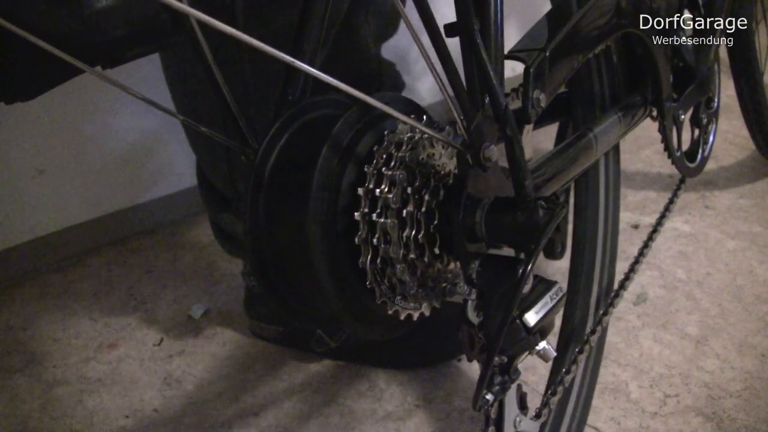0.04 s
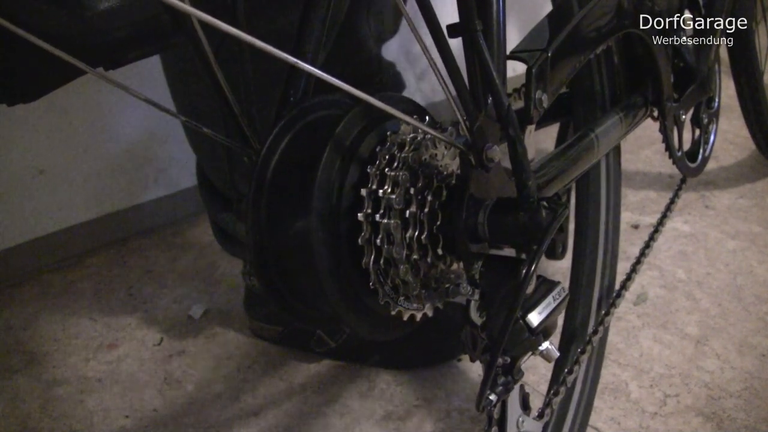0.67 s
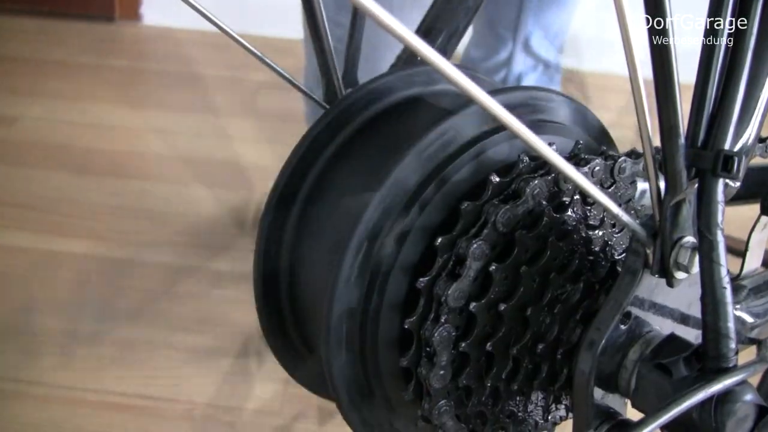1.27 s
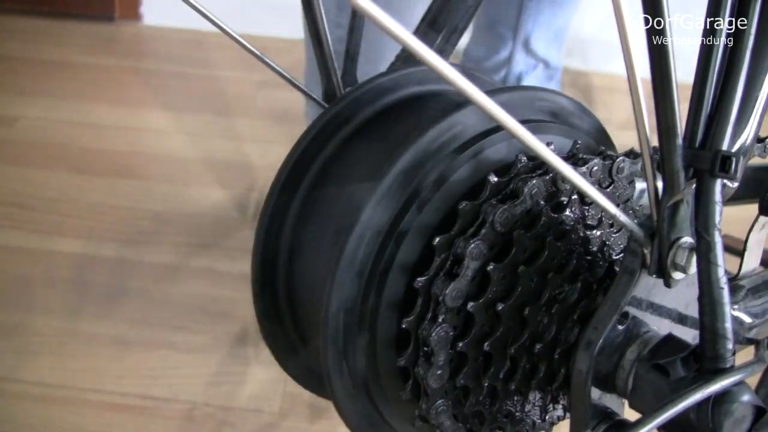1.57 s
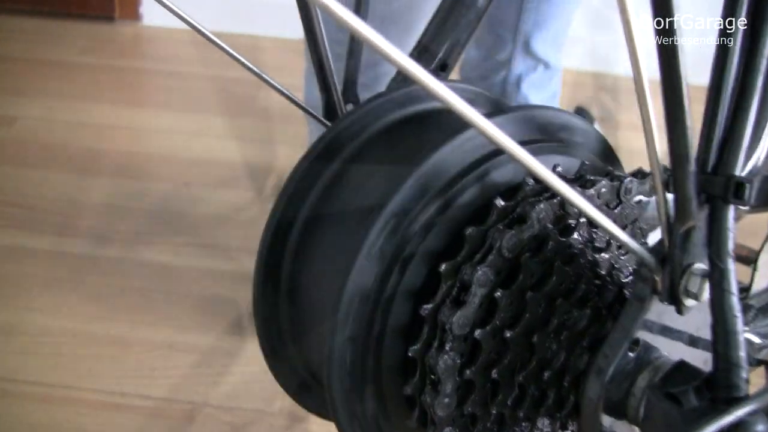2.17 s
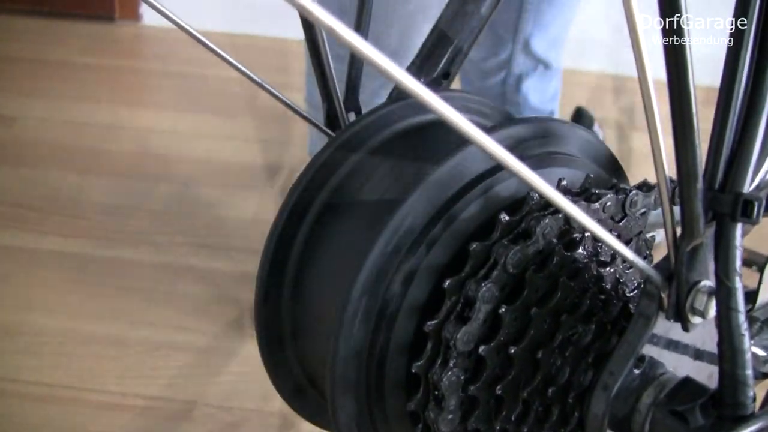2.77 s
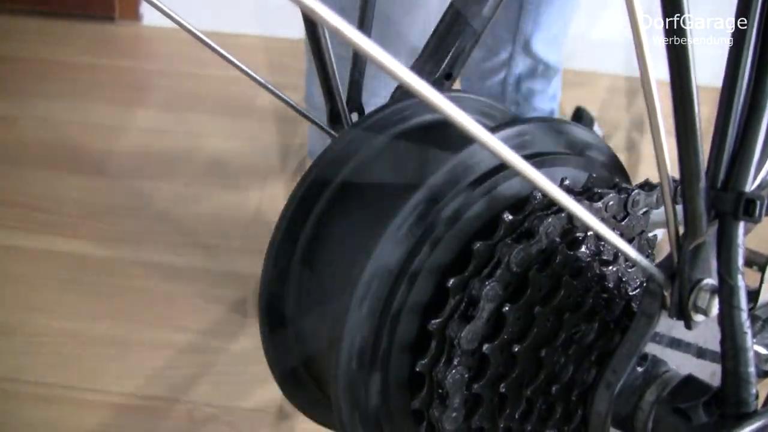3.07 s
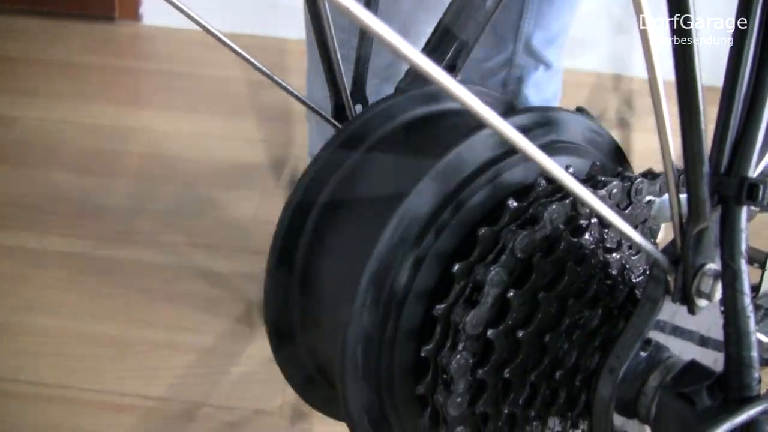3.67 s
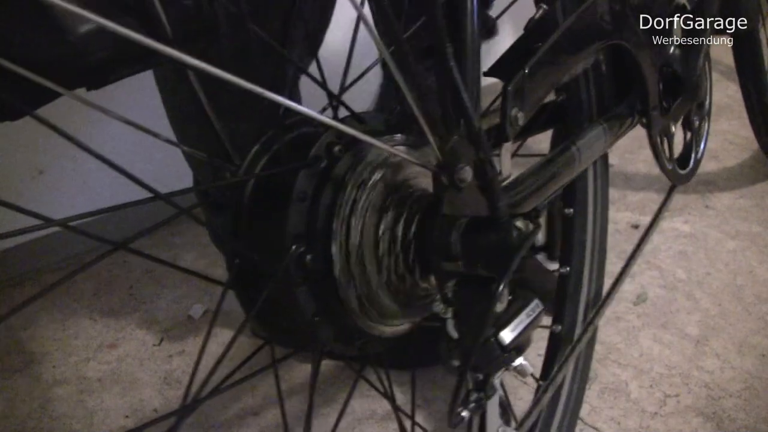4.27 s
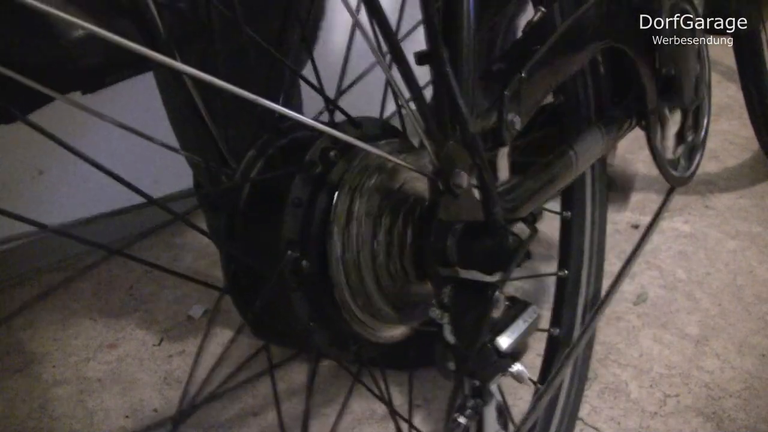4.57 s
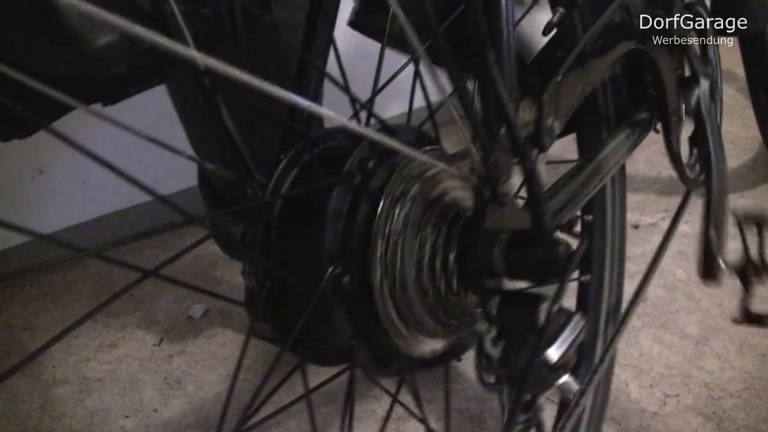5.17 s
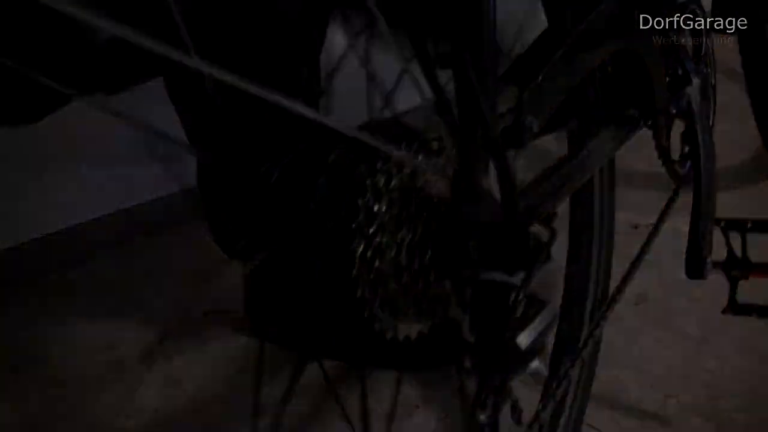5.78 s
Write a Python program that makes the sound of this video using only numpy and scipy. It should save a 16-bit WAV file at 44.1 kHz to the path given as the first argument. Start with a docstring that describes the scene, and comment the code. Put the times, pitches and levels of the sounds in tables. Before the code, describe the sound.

After a moment of faint cellar air, a bicycle freewheel cuts in very close, ticking brightly and rapidly, slowing a little over a soft whirr and a loose metallic clatter. After about three seconds it cuts off. The pedal drive takes up with a dull thud and knocks, the chain runs faintly with small clinks, and it stops with a loud steel clack that echoes in the bare room.

```python
"""Bicycle freewheel in a cellar

A rear wheel coasts close by: the pawl ticks about twelve times a second, slowing, over the whirr and
loose clatter of the hub. That sound cuts in and out over the air of an echoing cellar. Then the pedal
is kicked round: the drive takes up with a thud, the chain runs, and it stops with a steel clack."""
import sys
import numpy as np
from scipy import signal
from scipy.fft import rfft, irfft, next_fast_len
from scipy.io import wavfile
from scipy.ndimage import uniform_filter1d

SR = 44100
rng = np.random.default_rng(int(sys.argv[2]) if len(sys.argv) > 2 else 0)


def materialize(psi):
    """Save the field psi as 16-bit PCM at rate SR to the path in sys.argv[1].

    A 1-D psi becomes a single channel; in a 2-D psi each row is a channel.
    """
    bounded = np.clip(np.atleast_2d(psi).T, -1, 1)
    quanta = np.round(bounded * 32767).astype(np.int16)
    wavfile.write(sys.argv[1], SR, quanta)


N = 261513
COAST_START_S, COAST_END_S = 0.91, 3.985


def tooth_drops():
    """Pawl drops (start_s, level_db): gaps grow as the unbalanced wheel slows, wavering once a turn."""
    first_s, first_gap_s, gap_growth_s = 0.93127, 0.076399, 0.000577
    teeth, heavy_tooth, unbalance_s = 28, 13.6, 0.0017
    swell_teeth, loud_tooth = 5, 1.7
    tooth = np.arange(int((COAST_END_S - first_s) / first_gap_s))
    start_s = first_s + first_gap_s * tooth + gap_growth_s * tooth * (tooth - 1) / 2
    start_s += unbalance_s * np.cos(2 * np.pi * (tooth - heavy_tooth) / teeth)
    level_db = -15 + 1.8 * np.cos(2 * np.pi * (tooth - loud_tooth) / swell_teeth)
    return np.column_stack([start_s, level_db + rng.normal(0, 0.6, len(tooth))])


# Pawl snap spectrum: freq_hz, gain_db
SNAP_SPECTRUM = [(4000, -24.5), (6000, -15), (6800, -2), (7450, 5.5), (8000, -1.5), (8500, 2), (9800, -7.5),
                 (10800, 1.5), (11500, 6.5), (12300, -13), (13900, -3.5), (16000, -19.5)]
# Ratchet steel modes: freq_hz, level_db, t60_s
RATCHET_MODES = [(7660, 1, 0.014), (9280, -2, 0.066), (11000, 5, 0.025), (14070, 4, 0.033)]
# Hub shell and wheel spectrum: freq_hz, gain_db
SHELL_SPECTRUM = [(150, -52), (500, -8), (1080, -2.5), (1300, -6.5), (2000, -4), (2700, -7), (4800, -3),
                  (6000, -13.5), (7500, -16.5), (16000, -34)]
def pawl():
    """The pawl scrapes over the tooth's tip, snaps down and bounces; ratchet and hub shell ring."""
    drops = tooth_drops()
    snap = blows(drops, t60_s=0.005, ring_db=-10, crack_db=-4.5)
    # one scrape, two bounces
    for delay_s, t60_s, ring_db in [(-0.0018, 0.03, -23), (0.0007, 0.002, -3.5), (0.0021, 0.014, -9)]:
        offsets_s = delay_s * rng.uniform(0.64, 1.4, len(drops))
        snap += blows(drops + np.outer(offsets_s, [1, 0]), t60_s, ring_db)
    ratchet = amp(-26.5) * ringing(drops, RATCHET_MODES, spread_db=2.5)
    shell = blows([(s, rng.normal(-27.5, 1.5)) for s in drops[:, 0]], t60_s=0.029, ring_db=-3)
    return through(snap, SNAP_SPECTRUM) + ratchet + through(shell, SHELL_SPECTRUM)


# Hardest knocks of loose wheel parts: start_s, level_db, pitch_hz
HARD_KNOCKS = [(0.9346, -17, 2130), (0.9703, -16.5, 1860), (0.9819, -22, 2560), (1.1262, -13.5, 1680),
               (1.282, -23.5, 3020), (1.2926, -21, 1610), (1.3029, -25, 1980), (1.3415, -22, 3780),
               (1.3892, -16.5, 2960), (1.4523, -18, 1990), (1.496, -20.5, 2420), (1.5073, -27.5, 3280),
               (1.5403, -24, 2930), (1.5905, -26.5, 1970), (1.654, -22.5, 2400), (1.6762, -19.5, 2260),
               (1.6913, -19, 2360), (1.779, -25, 2100), (1.842, -25, 3160), (1.8691, -17, 2670),
               (1.8806, -18.5, 2110), (1.919, -20.5, 2630), (1.9567, -16.5, 1910), (1.9788, -22, 2030),
               (2.044, -22, 2540), (2.0951, -19, 2030), (2.295, -19.5, 3040), (2.3864, -17.5, 2310),
               (2.4279, -17.5, 2290), (2.515, -19.5, 2730), (2.6153, -22.5, 1420), (2.7346, -17.5, 1860),
               (2.7673, -22.5, 3140), (2.79, -17.5, 2270), (2.834, -15, 3080), (2.9451, -21, 2600),
               (2.9759, -19.5, 1740), (3.0956, -15, 1780), (3.176, -29, 2920), (3.227, -24.5, 2730),
               (3.245, -26.5, 1910), (3.2957, -16.5, 2000), (3.324, -18, 1920), (3.3858, -23, 2110),
               (3.401, -19.5, 1700), (3.4475, -20.5, 2140), (3.5046, -19, 1930), (3.5755, -16.5, 3100),
               (3.6727, -17.5, 2300), (3.7027, -17, 2090), (3.7142, -23, 2330), (3.8125, -19.5, 4260),
               (3.945, -19.5, 1960), (3.9696, -21.5, 2760)]
def loose_knocks():
    """Rows of hard knocks, one weaker rebound each, and soft jiggling throughout."""
    rebound_s, jiggle_gap_s = 0.014, 1 / 22
    rebounds = [(s + rebound_s * rng.uniform(0.5, 1.5), db - 13, hz) for s, db, hz in HARD_KNOCKS]
    jiggles = [(s + jiggle_gap_s * rng.random(), rng.normal(-31, 2), 2100 * rng.lognormal(0, 0.214))
               for s in np.arange(COAST_START_S, COAST_END_S, jiggle_gap_s)]
    return np.vstack([HARD_KNOCKS, rebounds, jiggles])


def bending_wave(start_hz, fall_s, t60_s):
    """A blow travels along thin steel: highs arrive first, so the pitch falls."""
    t = np.arange(SR // 30) / SR
    hz = start_hz * rng.lognormal(0, 0.12) / np.sqrt(1 + t / fall_s)
    cycles = np.cumsum(hz) / SR
    envelope = -np.expm1(-2 * cycles) * amp(-60 * t / t60_s)
    return (envelope * np.sin(2 * np.pi * cycles))[None]


def clatter():
    """Each loose knock runs along the spokes and returns weaker; the shell answers late."""
    onset_s, shell_lag_s = 0.0005, 0.0028
    waves, knocks = np.zeros((2, N)), loose_knocks()
    for s, db, hz in knocks:
        add(waves, s + onset_s, amp(db + 0.5) * bending_wave(1.5 * hz, fall_s=0.0009, t60_s=0.0065))
        return_s = s + rng.uniform(0.003, 0.006)
        add(waves, return_s, amp(db - 12) * bending_wave(hz, fall_s=0.002, t60_s=0.02))
    spokes = filtered(waves, lambda hz: hz ** 2 / (hz ** 2 + 700 ** 2))  # the spoke waves carry no bass
    hits = knocks[:, :2] + [onset_s, 0]
    cracks = blows(hits, t60_s=0.003, ring_db=-13, crack_db=1)
    answers = blows(hits + [shell_lag_s, 0], t60_s=0.0072, ring_db=-9)
    return spokes + through(cracks + answers, SHELL_SPECTRUM)


# Hub whirr spectrum: freq_hz, gain_db
WHIRR_SPECTRUM = [(150, -71), (250, -14), (950, 0.5), (2100, 0), (5200, -14.5), (7570, -11), (10000, -19),
                  (11300, -11.5), (13000, -29), (14200, -16), (16000, -46)]
def whirr():
    """Dense tiny contacts in the hub, quieter as it slows."""
    sag_db_per_s = 1
    age_s = np.arange(N) / SR - COAST_START_S
    contacts = grains(rate_per_s=12000, spread_db=6)
    return amp(-43.5 - sag_db_per_s * age_s) * through(contacts, WHIRR_SPECTRUM)


def coast_gate():
    """1 while the close hub is heard, else 0."""
    t = np.arange(N) / SR
    return uniform_filter1d(1.0 * ((t > COAST_START_S) & (t < COAST_END_S)), size=300)


# Hub shell resonances: freq_hz, width_hz, gain_db
SHELL_RESONANCES = [(1080, 45, -1), (1993, 40, -1)]
# Small room decay: freq_hz, t60_s
ROOM_DECAY = [(1500, 0.28), (15000, 0.061)]
def coasting():
    """The turning hub in a small room, gated; its shell sings with knocks and whirr."""
    ticks, knocks = pawl(), clatter()
    hub = ticks + knocks + whirr()
    hub += echo(amp(-12.5) * ticks + amp(-6.5) * knocks, ROOM_DECAY)
    return coast_gate() * (hub + resonances(hub, SHELL_RESONANCES))


# Drive loading the frame: start_s, level_db, pitch_hz
THUDS = [(4.3512, -23.5, 360), (4.3805, -23, 268), (4.395, -27.5, 403), (4.416, -37, 187),
         (4.446, -53, 185), (5.055, -30.5, 740), (5.272, -31.5, 338)]
def frame_thuds():
    """Dull blows: the loaded frame swings once or twice and is still."""
    rise_cycles = 0.42
    track, t = np.zeros((2, N)), np.arange(SR // 20) / SR
    for s, db, hz in THUDS:
        age = t * hz / rise_cycles
        swing = np.sin(2 * np.pi * hz * t) * age * np.exp(1 - age)
        add(track, s, amp(db) * swing[None])
    return low_cut(track, hz=130)


# Chain and crank knocks: start_s, level_db
CRANK_KNOCKS = [(3.97, -35), (4.3515, -34.5), (4.372, -25.5), (4.397, -23.5), (4.712, -37.5), (5.055, -34),
                (5.083, -36), (5.147, -30.5), (5.385, -27), (5.394, -29.5)]
# Crank spectrum: freq_hz, gain_db
CRANK_SPECTRUM = [(60, -20), (180, -1.5), (400, 11.5), (900, 4.5), (2000, -1.5), (3200, -8.5), (16000, -27)]
def crank_knocks():
    """Chain and crank knock as the pedal goes round."""
    return through(blows(CRANK_KNOCKS, t60_s=0.038, ring_db=-5.5, crack_db=1.5), CRANK_SPECTRUM)


# Drive stop impacts: start_s, level_db
CLACKS = [(5.2638, -16.5), (5.2713, -17)]
# Clack spectrum: freq_hz, gain_db
CLACK_SPECTRUM = [(70, -20), (300, -3), (850, 1), (1900, 1), (2900, -9), (4100, -7), (4900, 0), (6400, -10),
                  (16000, -18)]
def stop_clacks():
    """The drive stops short against steel and strikes again."""
    return through(blows(CLACKS, t60_s=0.034, ring_db=-6, crack_db=0.5), CLACK_SPECTRUM)


# Link impacts, and the bright ring of the second clack: start_s, level_db
CLINKS = [(4.396, -25.5), (4.505, -37.5), (4.626, -35.5), (4.639, -36), (4.711, -36.5), (4.808, -40),
          (5.129, -27), (5.228, -35), (5.2477, -25), (5.2712, -6.5)]
# Steel link spectrum: freq_hz, gain_db
LINK_SPECTRUM = [(2000, -16), (4800, -8), (8000, 2.5), (12000, 1), (16000, -6)]
def link_clinks():
    """Steel links snap onto the sprocket; the second clack rings brightly here too."""
    return through(blows(CLINKS, t60_s=0.019, ring_db=-8), LINK_SPECTRUM)


# Rustles: start_s, end_s, level_db; the first is already dying away as the scene opens
CHAIN_RUNS = [(0, -0.01, -57), (3.98, 4.28, -60), (4.408, 4.646, -54.5), (4.702, 4.71, -58.5),
              (5.13, 5.41, -55.5)]
# Chain rub spectrum: freq_hz, gain_db
RUB_SPECTRUM = [(300, -22), (1200, -6.5), (3500, -9.5), (16000, -34.5)]
def chain_rustle():
    """The chain rubs over the sprockets, gritty as its rollers seat one by one; a last rustle fades at the very
    start."""
    rise_db_per_s, fall_db_per_s = 257, 88
    envelope, t = np.zeros(N), np.arange(N) / SR
    for start_s, end_s, db in CHAIN_RUNS:
        before_s, after_s = np.maximum(start_s - t, 0), np.maximum(t - end_s, 0)
        envelope += amp(db - rise_db_per_s * before_s - fall_db_per_s * after_s)
    rub = through(grains(rate_per_s=1100, spread_db=8), RUB_SPECTRUM)
    grit = amp(-12) * through(grains(rate_per_s=180, spread_db=4), LINK_SPECTRUM)
    return envelope * (rub + grit)


# Light clicks on the frame: start_s, level_db
SLACK_CLICKS = [(0.047, -46), (0.783, -40.5), (0.835, -44)]
# Click spectrum: freq_hz, gain_db
CLICK_SPECTRUM = [(500, -14), (1700, -7), (1990, 1.5), (2400, -7), (3000, -6), (4000, -14), (16000, -24)]
def slack_clicks():
    """Something slack, perhaps a cable, taps the frame."""
    return through(blows(SLACK_CLICKS, t60_s=0.027, ring_db=-2), CLICK_SPECTRUM)


# Cellar decay: freq_hz, t60_s
CELLAR_DECAY = [(200, 1.5), (2000, 1.06), (5000, 0.83), (11000, 0.37)]
# Low cellar modes: freq_hz, level_db, t60_s
CELLAR_MODES = [(151, -2, 1.5), (182, -2, 1.3), (325, -3, 1.0), (403, -4, 1.0), (472, -4, 1.0)]
def pedalling():
    """The drive echoes in the bare cellar; thuds set its low modes booming."""
    thuds, knocks, clacks = frame_thuds(), crank_knocks(), stop_clacks()
    clinks, clicks, chain = link_clinks(), slack_clicks(), chain_rustle()
    send = thuds + amp(4.5) * knocks + amp(-2.5) * clacks + amp(-8) * clinks + clicks + chain
    cellar = echo(send, CELLAR_DECAY)
    boom = amp(-27.5) * ringing(np.array(THUDS)[:, :2], CELLAR_MODES, spread_db=1)
    direct = (thuds + knocks + clacks + clinks + clicks + chain) * amp([[0], [-4]])  # narrowed
    return low_cut(direct + cellar + boom, hz=70)


# Cellar air spectrum: freq_hz, gain_db
AIR_SPECTRUM = [(50, -19), (130, -5), (280, -4.5), (350, -1), (560, -1.5), (1300, -7), (2100, -10.5),
                (3700, -20), (16000, -31.5)]
# Faint cellar hum: freq_hz, width_hz, gain_db
HUM_RESONANCES = [(402, 30, -3), (484, 25, -1)]
def cellar_air():
    """A steady, wide rush; its faint hum drops out while the close hub is heard."""
    rush = amp(-54.5) * through(rng.standard_normal((2, N)), AIR_SPECTRUM) * amp([[0], [-4.5]])
    return rush + (1 - coast_gate()) * resonances(rush, HUM_RESONANCES)


def blows(rows, t60_s, ring_db, crack_db=-np.inf):
    """Mid and side of contacts (start_s, level_db): a centred crack, then a dense, fast-dying ring."""
    track, t = np.zeros((2, N)), np.arange(SR // 5) / SR
    fade = amp(-60 * t / t60_s)
    for s, db in rows:
        ring = fade * rng.standard_normal((2, len(t)))
        ring *= amp(ring_db) * np.linalg.norm(fade) / np.linalg.norm(ring[0])
        ring[0, 0] += amp(crack_db)
        add(track, s, amp(db) * ring)
    return track


def ringing(rows, modes, spread_db):
    """Each contact (start_s, level_db) rings the modes at new strengths."""
    longest_s = max(t60_s for _, _, t60_s in modes)
    track, t = np.zeros((2, N)), np.arange(int(SR * longest_s)) / SR
    for s, db in rows:
        for hz, mode_db, t60_s in modes:
            envelope = amp(rng.normal(mode_db, spread_db) - 60 * t / t60_s) * -np.expm1(-t * hz)
            cycles = hz * rng.normal(1, 0.0036) * t + rng.random()
            add(track, s, amp(db) * envelope * np.sin(2 * np.pi * cycles)[None])
    return track


def grains(rate_per_s, spread_db):
    """Mid and side of many tiny, uneven contacts, at rms 1."""
    size_db = np.minimum(rng.normal(0, spread_db, N), 2 * spread_db)
    struck = rng.random(N) < rate_per_s / SR
    contacts = struck * amp(size_db) * rng.standard_normal((2, N))
    return contacts / np.sqrt(np.mean(contacts ** 2) + 1e-20)


def echo(x, decay, block=8192):
    """A room's diffuse tail, new for each block; treble dies first."""
    wet = np.zeros((2, N))
    hz, t, noise = signal.stft(rng.standard_normal((2, SR * 3 // 2)), SR, nperseg=256)
    fade = amp(-60 * t / along(decay, hz)[:, None])
    for start in range(0, N, block):
        piece = x[:1, start:start + block]
        if np.abs(piece).max() > 1e-6:
            shifted = np.roll(noise, rng.integers(len(t)), axis=2)
            tail = signal.istft(shifted * fade, SR, nperseg=256)[1]
            add(wet, start / SR, signal.fftconvolve(piece, tail / np.linalg.norm(tail[0]), axes=1))
    return wet


def resonances(x, modes):
    """The narrow resonances that x excites."""
    return filtered(x, lambda f: sum(amp(db) * 1j * f * width / (hz ** 2 - f ** 2 + 1j * f * width)
                                     for hz, width, db in modes))


def through(x, spectrum, size=4096):
    """x through a minimum-phase, unit-energy body with this spectrum."""
    gain = amp(along(spectrum, np.fft.rfftfreq(size, 1 / SR)))
    cepstrum = irfft(np.log(gain))
    cepstrum[1:size // 2] *= 2
    cepstrum[size // 2 + 1:] = 0
    body = irfft(np.exp(rfft(cepstrum)))
    return signal.fftconvolve(x, body[None] / np.linalg.norm(body), axes=1)[:, :N]


def filtered(x, response):
    """x with its spectrum scaled by response(hz)."""
    size = next_fast_len(N + SR // 2)
    return irfft(rfft(x, size) * response(np.fft.rfftfreq(size, 1 / SR)), size)[..., :N]


def low_cut(x, hz):
    """Fourth-order high-pass."""
    return signal.sosfilt(signal.butter(4, hz, "highpass", fs=SR, output="sos"), x)


def along(points, hz):
    """Interpolate (freq_hz, value) points on a log axis."""
    freqs, values = np.transpose(points)
    return np.interp(np.log(hz + 1), np.log(freqs), values)


def amp(db):
    """Decibels to gain."""
    return 10 ** (np.asarray(db) / 20)


def add(track, start_s, sound):
    """Mix into a track; a one-row sound feeds both mid and side."""
    part = track[:, round(start_s * SR):][:, :sound.shape[1]]
    part += sound[:, :part.shape[1]]


def stereo(x, width=((1, 0),)):
    """Mid and side to left and right."""
    side = filtered(x[1], lambda hz: amp(along(width, hz)))
    return np.array([x[0] + side, x[0] - side])


# Hub stereo width: freq_hz, side_gain_db
HUB_WIDTH = [(400, -6), (1000, -11), (4000, -13), (8000, -9)]
# Hub balance: freq_hz, left_over_right_db
HUB_BALANCE = [(8500, -1.5), (11000, -0.5), (13900, 18), (15000, -26)]
# Cellar stereo width: freq_hz, side_gain_db
CELLAR_WIDTH = [(130, -26), (900, -12), (3500, -8.5), (9000, 0.5)]
def scene():
    """Hub, drive and cellar air; the hub throws its highest ring to the left."""
    hub = stereo(coasting(), HUB_WIDTH)
    hub = filtered(hub, lambda hz: amp(np.outer([0.5, -0.5], along(HUB_BALANCE, hz))))
    return hub + stereo(pedalling(), CELLAR_WIDTH) + stereo(cellar_air())


def record(dry):
    """Bass rolls off below 60 Hz; nothing passes above 16 kHz."""
    return filtered(dry, lambda hz: 1j * hz / (1j * hz + 60) * (hz < 16000))


dry = scene()
out = record(dry)
materialize(out)
```